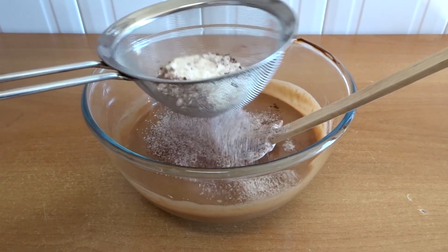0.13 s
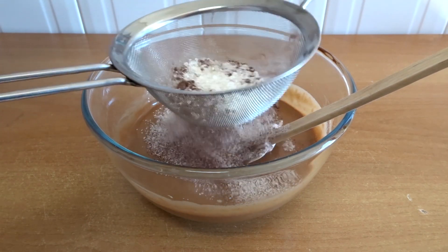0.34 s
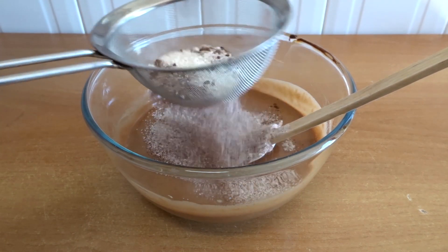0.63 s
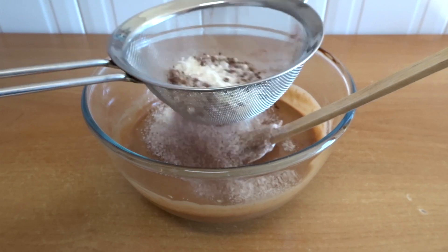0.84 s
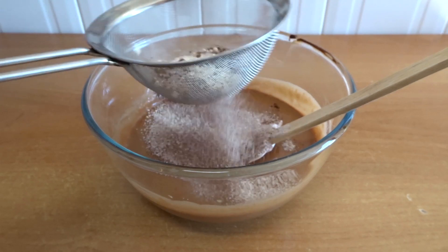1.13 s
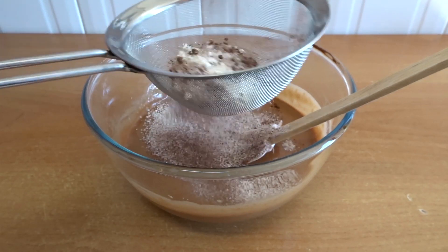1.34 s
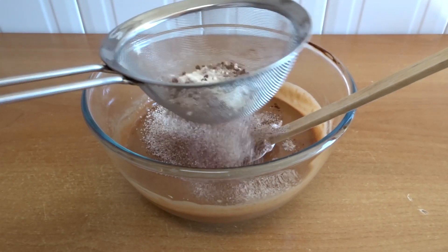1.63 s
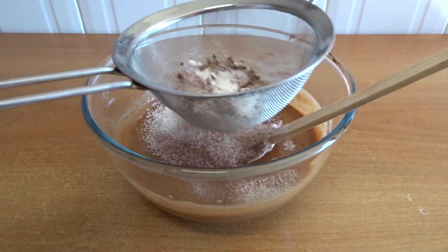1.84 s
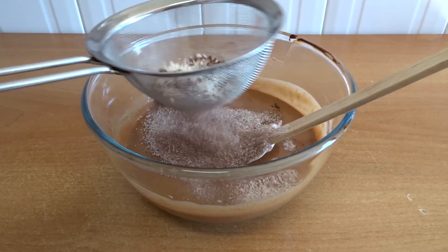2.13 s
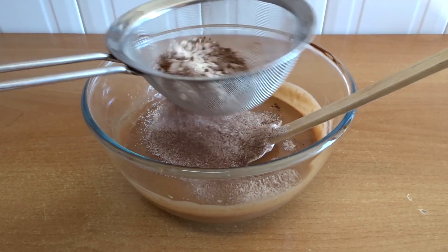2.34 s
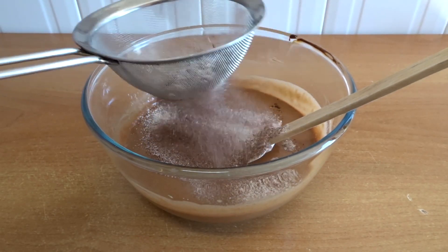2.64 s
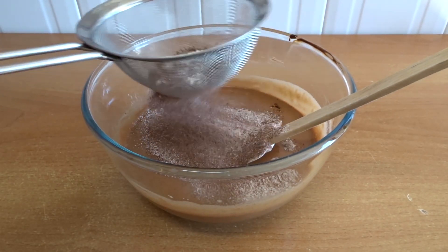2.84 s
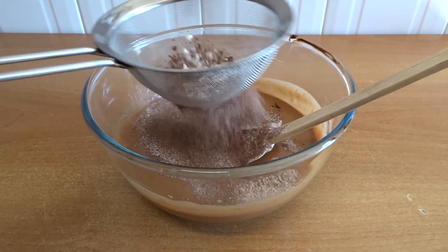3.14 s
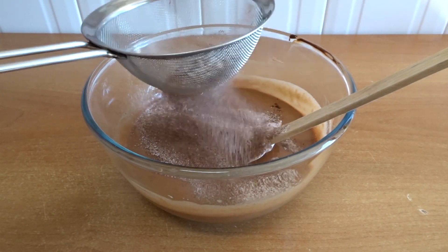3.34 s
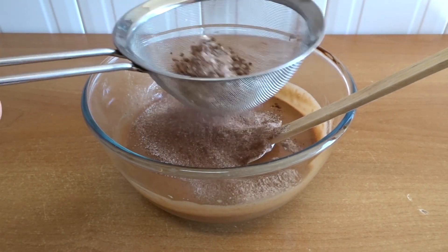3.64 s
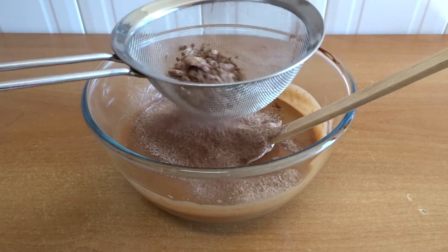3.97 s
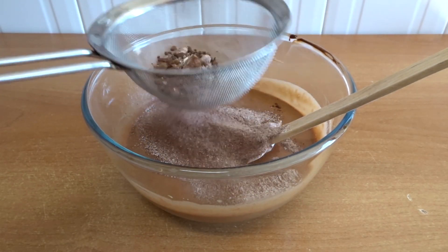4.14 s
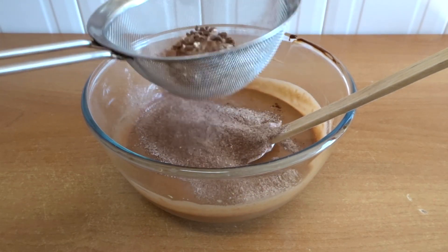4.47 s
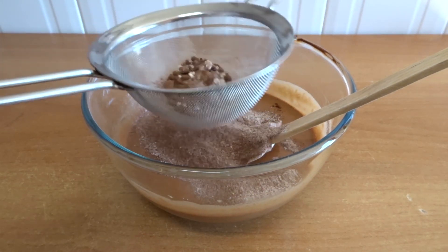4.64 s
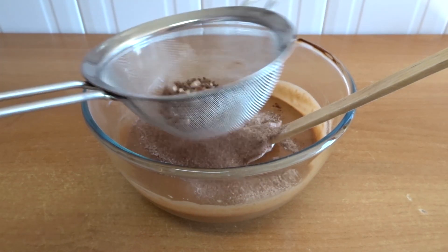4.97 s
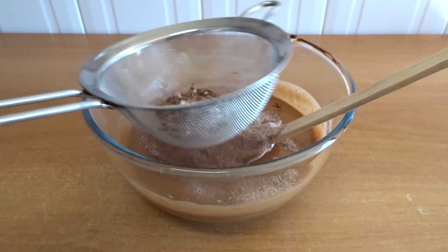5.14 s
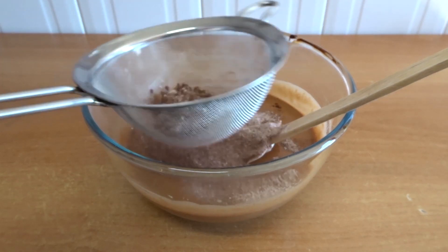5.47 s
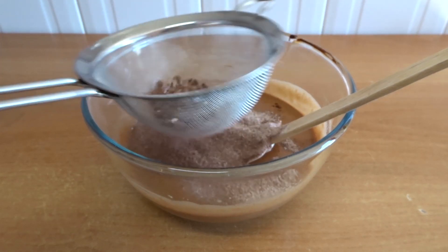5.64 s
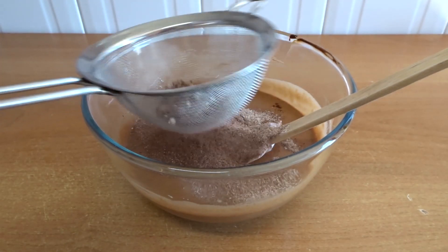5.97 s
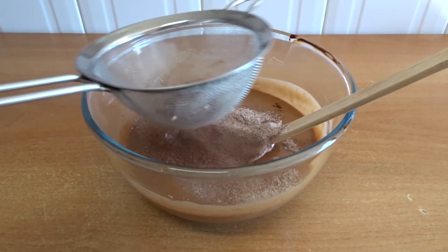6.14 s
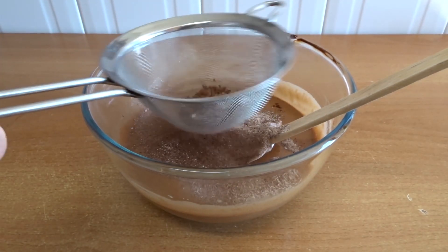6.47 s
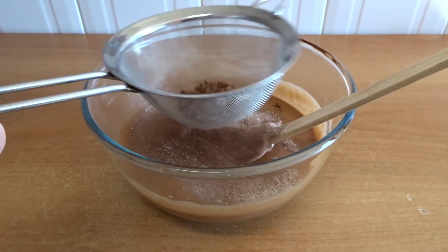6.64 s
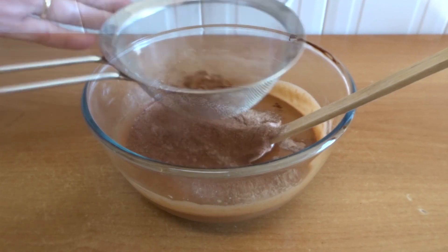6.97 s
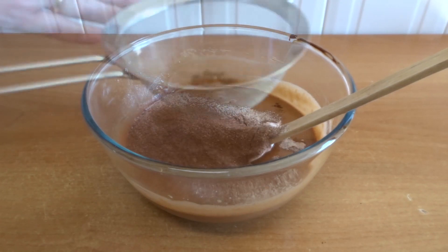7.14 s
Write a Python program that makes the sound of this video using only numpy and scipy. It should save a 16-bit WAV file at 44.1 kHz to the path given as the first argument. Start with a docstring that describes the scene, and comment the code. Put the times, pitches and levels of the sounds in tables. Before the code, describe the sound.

In a quiet kitchen, fine powder is shaken through a steel mesh sieve at about eleven or twelve soft, hissing strokes a second, with a faint metallic ring. After four seconds the shaking thins and pauses, then resumes. A dish knocks loudly with a quick bounce and scrapes in stuttering slips. Fainter strokes follow, then a sharp little click and a powdery slide. A clock ticks faintly. Close stereo microphone.

```python
"""Sieving flour and cocoa

Powder is shaken through a steel mesh sieve, more than eleven strokes a second: noise swells with each
stroke and rings the basket. A dish knocks and bounces as decaying modes and dense noise, then is dragged
in short juddering slips. At the end the sieve clicks and the last powder slides, as shaped noise.
A faint clock ticks in soft noise bursts over the room hiss, and the level dips briefly now and then."""
import sys
import numpy as np
from scipy import signal
from scipy.fft import rfft, irfft, next_fast_len
from scipy.io import wavfile
from scipy.ndimage import uniform_filter1d, map_coordinates

SR = 44100
rng = np.random.default_rng(int(sys.argv[2]) if len(sys.argv) > 2 else 0)


def waveform_to_disk(signal):
    """Save audio, clipped to [-1, 1], as 16-bit WAV at the path in sys.argv[1]."""
    frames = np.transpose(np.atleast_2d(signal))
    scaled = np.clip(frames, -1, 1) * 32767
    samples = np.round(scaled).astype(np.int16)
    wavfile.write(sys.argv[1], SR, samples)


N = 322371
T = np.arange(N) / SR  # time in seconds


def amp(db):
    """Decibels to gain."""
    return 10 ** (np.asarray(db) / 20)


def unit(x):
    """Scale to rms 1."""
    return x / np.sqrt(np.mean(x ** 2) + 1e-20)


def along(points, hz):
    """Read (Hz, value) points along a logarithmic frequency axis."""
    point_hz, values = np.transpose(points)
    return np.interp(np.log(hz + 1), np.log(point_hz + 1), values)


def wobble(rate):
    """A smooth random curve with this many knots a second."""
    knots = rng.standard_normal(int(N * rate / SR) + 4)
    return map_coordinates(knots, [T * rate])


def filtered(x, response):
    """Multiply the spectrum of x by a response of frequency."""
    n = x.shape[-1]
    size = next_fast_len(n + 8192)
    hz = np.fft.rfftfreq(size, 1 / SR)
    return irfft(rfft(x, size) * response(hz), size)[..., :n]


def pan(db):
    """Left and right gains for a level difference; positive leans left."""
    return amp(np.array([[db], [-db]]) / 2)


def add(out, s, sound):
    """Mix a sound in at time s."""
    part = out[:, round(s * SR):][:, :sound.shape[-1]]
    part += sound[..., :part.shape[1]]


# How alike left and right are in the room. Each row: frequency in Hz, correlation (1 is identical).
ROOM_LIKENESS = [(100, 0.92), (700, 0.92), (1400, 0.29), (2800, 0.26), (5000, 0.23), (12000, 0.084)]
# The same for the mesh and the clock. Each row: frequency in Hz, correlation.
MESH_LIKENESS = [(400, 0.039), (1400, 0.23), (2800, 0.31), (5000, 0.25), (9000, 0.26), (14000, 0.095)]


def coloured(pair, spectrum, likeness):
    """Two unrelated signals become a stereo pair of rms 1 with this spectrum and likeness."""
    def mid_and_side(hz):
        angle = np.arccos(np.clip(along(likeness, hz), -1, 1)) / 2
        return amp(along(spectrum, hz)) * [np.cos(angle), np.sin(angle)]

    mid, side = filtered(pair, mid_and_side)
    return unit(np.array([mid + side, mid - side]))


# An even spectrum. Each row: frequency in Hz, relative density in dB per Hz.
FLAT = [(100, 0), (10000, 0)]


def burst(spectrum, likeness):
    """One second of fresh coloured stereo noise."""
    return coloured(rng.standard_normal((2, SR)), spectrum, likeness)


def grains(spread_db):
    """Countless tiny impacts of log-normal size, the same sizes in both channels but with each channel's own
    noise."""
    return rng.standard_normal((2, N)) * amp(spread_db * rng.standard_normal(N))


def mesh(spectrum, spread_db):
    """Powder grains strike the wires: uneven noise coloured by the mesh."""
    return coloured(grains(spread_db), spectrum, MESH_LIKENESS)


def resonant(x, peaks):
    """Lift x at (Hz, width Hz, lift dB) resonances, then scale to rms 1."""
    def lift(hz):
        return amp(sum(db / (1 + (2 * (hz - centre) / width) ** 2) for centre, width, db in peaks))

    return unit(filtered(x, lift))


def swells(rows, attack_s, sag_db_per_s, release_db_per_s):
    """Gain of (start, length, dB) movements: each builds up, sags steadily, then dies away faster."""
    gain = 0
    for s, length, db in rows:
        sag = sag_db_per_s * np.maximum(T - s, 0)
        release = release_db_per_s * np.maximum(T - s - length, 0)
        gain = gain + np.clip((T - s) / attack_s, 0, 1) * amp(db - sag - release)
    return gain


# Reverberation of the kitchen. Each row: frequency in Hz, time to fall 60 dB in seconds.
KITCHEN = [(100, 0.15), (300, 0.62), (700, 0.48), (1500, 0.44), (3600, 0.43), (8000, 0.44), (14000, 0.11)]


def dying(noise):
    """A blow's sound in the kitchen: each frequency dies at its own speed."""
    hz, t, z = signal.stft(noise, SR, nperseg=256)
    decay = amp(-60 * t / along(KITCHEN, hz)[:, None])
    return signal.istft(z * decay, SR, nperseg=256)[1][:, :SR]


# Colour of the room air. Each row: frequency in Hz, relative density in dB per Hz.
HISS_COLOUR = [(60, -26), (250, -53.5), (340, -12.5), (440, 7), (580, -17.5), (780, -29), (1050, 1.5),
               (1500, 5.5), (2300, 4.5), (3200, -3.5), (5000, -2.5), (8000, -8), (11000, -24.5),
               (12500, -37.5), (15000, -45)]


def hiss(db=-68.5):
    """The quiet air of the kitchen: noise that is steady but for a very slight drift in level."""
    level = amp(db + 0.14 * wobble(3.8))
    return level * coloured(rng.standard_normal((2, N)), HISS_COLOUR, ROOM_LIKENESS)


# Ticks across the room. Each row: start in seconds, level in dB before rise and room decay.
TICKS = [(.825, -63), (1.827, -62.5), (2.83, -56.5), (3.82, -60.5), (4.824, -60), (5.825, -63)]
# Colour of a tick. Each row: frequency in Hz, relative density in dB per Hz.
TICK_COLOUR = [(300, -33), (750, -23.5), (950, 3), (1200, -8), (2200, -9.5), (3000, 1.5), (3400, -0.5),
               (3800, 3), (4300, -1.5), (6000, -6), (9000, -19), (15000, -24.5)]


def clock(second_s=.035, second_db=1, rise_s=0.0032):
    """Each two-part tick arrives only as a soft wash of decaying noise from the room."""
    out, t = np.zeros((2, N)), np.arange(SR) / SR
    rise = 1 - np.exp(-t / rise_s)
    for s, db in TICKS:
        for delay, part_db in [(0, 0), (second_s, second_db)]:
            wash = dying(burst(TICK_COLOUR, MESH_LIKENESS))
            add(out, s + delay, amp(db + part_db) * rise * wash)
    return out


# Small clicks of the sieve. Each row: start in seconds, level in dB before the rise, low corner in Hz,
# high corner in Hz, time to fall 60 dB in seconds, left-right difference in dB.
TAPS = [(1.5, -63, 850, 900, 0.12, 5), (2.897, -49.5, 1200, 6000, 0.027, -3.5),
        (4.379, -60, 900, 2200, 0.027, -5), (6.8246, -42.5, 350, 3000, 0.026, -5.5),
        (6.8266, -43, 2000, 3000, 0.015, -5), (6.865, -32.5, 750, 10760, 0.0093, -9),
        (6.869, -51.5, 130, 400, 0.014, 3), (6.999, -58, 130, 420, 0.09, 2)]
# Colour of a click before its band. Each row: frequency in Hz, relative density in dB per Hz.
TAP_COLOUR = [(40, -30), (150, -28), (450, 0), (1200, -6.5), (3000, -4), (5000, -6.5), (10000, -7.5),
              (15000, -14)]
# Resonances of the sieve's rim. Each row: frequency in Hz, width in Hz, lift in dB.
RIM = [(1900, 340, 8), (2850, 280, 13)]


def taps(rise_s=0.000068):
    """Short damped clicks of the hand-held sieve: band-limited noise lifted by the rim's resonances."""
    out, t = np.zeros((2, N)), np.arange(SR) / SR
    rise = 1 - np.exp(-t / rise_s)
    for s, db, low_hz, high_hz, t60, pan_db in TAPS:
        def band(hz):
            below_high = 1 / np.hypot(1, (hz / high_hz) ** 2)
            return below_high / np.hypot(1, (low_hz / (hz + 1)) ** 2)

        click = resonant(filtered(burst(TAP_COLOUR, ROOM_LIKENESS), band), RIM)
        add(out, s, click * amp(db - 60 * t / t60) * rise * pan(pan_db))
    return out


# Powder sliding on the tilted sieve. Each row: start in seconds, length in seconds, level in dB
# before attack and sag.
SLIDES = [(6.82, 0.16, -58), (7.04, 0.073, -56.5), (7.175, 0.3, -63)]
# Colour of the slide. Each row: frequency in Hz, relative density in dB per Hz.
SLIDE_COLOUR = [(100, -22), (200, -18.5), (400, -5), (750, -5), (1300, -1.5), (2000, 2.5), (3200, -1),
                (5000, -5), (9000, -11), (12000, -14.5), (15500, -21)]


def sliding(attack_s=0.032, sag_db_per_s=35, release_db_per_s=130):
    """The last powder slides over the tilted mesh: swells of grainy noise."""
    powder = mesh(SLIDE_COLOUR, spread_db=4)
    return swells(SLIDES, attack_s, sag_db_per_s, release_db_per_s) * powder * pan(db=-0.5)


# Pushes of the dish after the knock. Each row: start in seconds, length in seconds, level in dB
# before attack, sag and the drag's gain.
PUSHES = [(5.74, 0.38, -57), (5.932, 0.3, -48.5)]
# Slips during the second push. Each row: start in seconds, then scrape, groan, grit and thud levels
# in dB before the rise and the drag's gain.
SLIPS = [(5.95, -42.5, -60, -58, -74), (5.966, -44, -44, -55, -67), (5.988, -40.5, -38.5, -60, -71),
         (6.004, -38.5, -42, -63, -67), (6.016, -37.5, -36.5, -54, -61), (6.036, -38, -39, -53, -63),
         (6.046, -39.5, -43, -50, -70), (6.061, -36, -49, -51, -64), (6.081, -36, -53, -53, -49),
         (6.101, -39.5, -44, -62, -51), (6.119, -43, -44, -44, -54), (6.129, -40.5, -39, -60, -53),
         (6.143, -43.5, -51, -47, -51), (6.16, -39, -55, -52, -55), (6.174, -47, -49, -61, -60),
         (6.187, -48, -53, -66, -59)]
# Colour of the rubbing. Each row: frequency in Hz, relative density in dB per Hz.
RUB_COLOUR = [(60, -54), (130, -60), (240, -36.5), (350, -9.5), (560, -2.5), (740, -4.5), (850, -4.5),
              (1100, -0.5), (1350, -6), (1850, -10.5), (2050, -13.5), (3200, -17), (4700, -27),
              (7000, -35.5), (9500, -37), (12000, -73)]
# Clusters of close modes that colour drag and knock. Each row: frequency in Hz, width in Hz, lift in dB.
CLUSTERS = [(1570, 90, 5), (1850, 90, 3), (3620, 120, 9), (5410, 150, 14), (6290, 140, 12), (7480, 240, 9),
            (8270, 90, 8), (9055, 90, 9)]
# Resonances a slip sets off. Each holds: frequency in Hz, width in Hz, time to fall 60 dB in seconds.
GROAN = (850, 140, .09)
GRIT = (2450, 490, 0.041)
SLIP_THUD = (350, 154, .09)


def drag(attack_s=0.048, sag_db_per_s=24, release_db_per_s=340, wet_db=-7, gain_db=-2.5):
    """The dish judders along the table in slips, each with its groan, grit and thud; the room smears them."""
    rubbing = resonant(coloured(grains(spread_db=4.5), RUB_COLOUR, ROOM_LIKENESS), CLUSTERS)
    rub = swells(PUSHES, attack_s, sag_db_per_s, release_db_per_s) * rubbing
    t = np.arange(SR) / SR
    slip_t60, slip_rise_s = .07, .0045
    for s, scrape_db, *levels in SLIPS:
        scrape = resonant(burst(RUB_COLOUR, ROOM_LIKENESS), CLUSTERS)
        slip = scrape * amp(scrape_db - 60 * t / slip_t60)
        for (centre, width, t60), db in zip([GROAN, GRIT, SLIP_THUD], levels):
            ring = filtered(burst(FLAT, ROOM_LIKENESS),
                            lambda hz: 1 / (1 + (2 * (hz - centre) / width) ** 4))
            slip = slip + unit(ring) * amp(db - 60 * t / t60)
        add(rub, s, slip * (1 - np.exp(-t / slip_rise_s)))
    tail = dying(burst(FLAT, ROOM_LIKENESS))
    tail = tail / np.linalg.norm(tail[0])
    wet = signal.fftconvolve(rub.mean(axis=0)[None], tail, axes=1)[:, :N]
    return amp(gain_db) * (rub + amp(wet_db) * wet) * pan(db=1.5)


# Contacts of the bouncing dish. Each row: start in seconds, relative level of the ring in dB,
# snap level in dB, jolt level in dB before its bass cut, jolt frequency in Hz.
KNOCKS = [(5.474, -21.5, -24, -19, 1300), (5.4772, -29, -32, -18.5, 2400),
          (5.481, -24.5, -41.5, -23.5, 1203), (5.5048, -25, -32.5, -19, 1725),
          (5.5149, -27, -34.5, -11, 1400), (5.5266, -33, -47, -15.5, 850)]
# Hard edge of a contact. Each row: frequency in Hz, relative density in dB per Hz.
SNAP_COLOUR = [(300, -25.5), (1500, 9.5), (4000, 5), (5500, -14), (9000, -18.5), (15000, -29.5)]
# Dense ring of dish and table. Each row: frequency in Hz, relative density in dB per Hz.
THUD_COLOUR = [(30, -69), (85, -53), (130, -17.5), (200, -46.5), (300, -20), (430, -5.5), (690, 4),
               (1300, 7), (2200, 2.5), (3000, -5.5), (4100, -8.5), (4700, -11.5), (6000, -19), (10000, -31),
               (12000, -49.5), (15000, -59)]


def contacts(crack_db=5, snap_t60=0.026):
    """Every contact jolts the dish, snaps, cracks and sets off a dense ring in dish, table and room."""
    out, t = np.zeros((2, N)), np.arange(SR) / SR
    dense_db, rise_s = -8, .0004
    crack_t60, jolt_t60, jolt_low_hz = .02, .008, 450
    attack = 1 - np.exp(-t / rise_s)
    for s, db, snap_db, jolt_db, jolt_hz in KNOCKS:
        # the direct jolt is a few cycles long and thin in the bass
        cycles = amp(jolt_db - 60 * t / jolt_t60) * np.sin(2 * np.pi * jolt_hz * t)
        jolt = filtered(cycles, lambda hz: (1j * hz / (jolt_low_hz + 1j * hz)) ** 2)
        snap = amp(snap_db - 60 * t / snap_t60) * burst(SNAP_COLOUR, ROOM_LIKENESS)
        add(out, s, jolt + snap)
        dense = dying(resonant(burst(THUD_COLOUR, ROOM_LIKENESS), CLUSTERS))
        crack = burst(THUD_COLOUR, ROOM_LIKENESS) * amp(crack_db - 60 * t / crack_t60)
        add(out, s, amp(db + dense_db) * attack * (dense + crack * pan(db=6.0)))
    return out


# Modes of the dish. Each row: frequency in Hz, relative level in dB, time to fall 60 dB in seconds.
DISH_MODES = [(137, -23.1, 0.26), (257, -17.7, 0.45), (325, -19.5, 0.45), (393, -19, 0.55),
              (440, -14.5, 0.4), (540, -10.1, 0.35), (588, -14.2, 0.45), (626, -6.6, 0.45),
              (657, -9.0, 0.45), (689, -6, 0.33), (711, 0, 0.28), (748, -10, 0.45), (824, -6, 0.31),
              (854, -2.0, 0.3), (881, -0.5, 0.4), (947, -3, 0.42), (985, -7, 0.35), (1043, -5, 0.35),
              (1082, -6, 0.25), (1116, 2.5, 0.24), (1149, 2.6, 0.32), (1188, -2.4, 0.32), (1241, 1, 0.29),
              (1315, -4.5, 0.33), (1341, 4, 0.3), (1375, -3.8, 0.3), (1409, -6.0, 0.4), (1438, 1, 0.3),
              (1497, -7, 0.38), (1540, -1.8, 0.28), (1567, -3, 0.34), (1637, -7, 0.25), (1680, -5.5, 0.26),
              (1768, -5.5, 0.28), (1795, -6, 0.26), (1835, -8.5, 0.28), (1859, -8.5, 0.36),
              (1941, -9.3, 0.36), (2056, -9, 0.25), (2101, -4.0, 0.24), (2164, -7.2, 0.32),
              (2188, -9, 0.34), (2229, -8, 0.34), (2275, -12, 0.3), (2430, -15, 0.35), (2492, -17.0, 0.4),
              (2716, -12, 0.3), (2881, -13.1, 0.34), (3008, -10.5, 0.28), (3110, -16.6, 0.44),
              (3502, -14.4, 0.33), (3534, -13.9, 0.39), (3597, -14.4, 0.42), (3731, -18, 0.2),
              (4000, -21, 0.27), (4130, -20, 0.27), (4247, -21, 0.29), (5003, -14.5, 0.2),
              (5334, -17, 0.28), (5399, -9.5, 0.23), (5432, -17, 0.26), (6247, -16.5, 0.24),
              (6281, -17, 0.25), (7330, -26.5, 0.22), (7526, -23, 0.28), (8247, -30, 0.5),
              (9055, -27.5, 0.27), (9679, -32.5, 0.3), (10300, -36, 0.4), (10620, -37, 0.35)]
MODE_SPREAD = 0.28  # share of the room's left-right phase angle given to each mode


def dish_ring(ring_db=-13.3, rise_s=.0004):
    """The dish rings in decaying sine modes; every contact adds its energy to each mode."""
    out, t, start = np.zeros((2, N)), np.arange(SR) / SR, KNOCKS[0][0]
    attack = 1 - np.exp(-t / rise_s)
    for hz, mode_db, t60 in DISH_MODES:
        energy = 0
        for s, db, *_ in KNOCKS:
            since = t + start - s
            energy = energy + amp(db - 60 * np.abs(since) / t60) ** 2 * (since >= 0)
        swing = attack * np.sqrt(np.abs(uniform_filter1d(energy, size=256)))
        # where left and right are less alike, the mode reaches them further out of step
        angle = np.arccos(np.clip(along(ROOM_LIKENESS, hz), -1, 1))
        apart = MODE_SPREAD * angle * rng.choice([-1, 1]) * np.array([[.5], [-.5]])
        sine = np.sin(2 * np.pi * (hz * t + rng.random()) + apart)
        add(out, start, amp(ring_db + mode_db) * swing * sine)
    return out


def knock():
    """The dish lands and bounces: noisy contacts over the ring of its modes."""
    return contacts() + dish_ring()


# Resonances of the mesh basket. Each row: frequency in Hz, width in Hz, relative level in dB.
BASKET = [(462, 27, -7), (650.6, 150, -8.5), (972, 19, -3), (1366, 39, -2), (1465, 98, 1), (2355, 200, 3),
          (3170, 290, -7.5)]


def basket(x, tuning):
    """Pass x through the basket's resonances, shifted by a tuning factor, and scale to rms 1."""
    def response(hz):
        return sum(amp(db) / (1 + (2 * (hz - centre * tuning) / width) ** 2)
                   for centre, width, db in BASKET)

    return unit(filtered(x, response))


# Strokes of the sieve, resting after four seconds; played by ringing() and shaking().
# Each row: time in seconds, relative powder hiss in dB, relative basket ring in dB.
STROKES = [(0.016, -62.5, -68), (0.085, -64.5, -73), (0.165, -63, -67.5), (0.256, -59, -72),
           (0.333, -61, -68), (0.414, -61, -76), (0.497, -58.5, -67), (0.581, -59, -66),
           (0.663, -59.5, -65.5), (0.754, -58, -65), (0.838, -60, -62), (0.919, -58.9, -65.3),
           (0.999, -58.5, -67.5), (1.091, -58, -62.5), (1.17, -60.5, -65), (1.258, -59.5, -65.5),
           (1.344, -63, -70), (1.426, -61, -66.5), (1.496, -61.5, -70), (1.583, -61, -65.5),
           (1.662, -63.5, -66), (1.746, -62.5, -75), (1.835, -60, -65), (1.917, -57.5, -67),
           (1.998, -58, -67.5), (2.084, -59.5, -66), (2.171, -59, -76), (2.26, -57.5, -64),
           (2.354, -57, -68), (2.441, -56.5, -63), (2.53, -57.5, -64.5), (2.621, -56.5, -62.5),
           (2.708, -57, -71), (2.805, -56, -65), (2.893, -58, -61), (2.988, -57, -62.5),
           (3.075, -58.5, -64.5), (3.164, -61, -65.5), (3.249, -63.5, -69.5), (3.334, -61, -67.5),
           (3.419, -62.5, -67), (3.514, -61.5, -70), (3.599, -61.5, -71), (3.688, -61, -67.5),
           (3.779, -62.5, -69), (3.866, -63, -66), (3.947, -63.5, -70), (4.043, -64, -67.5),
           (4.139, -65, -78), (4.21, -74, -86), (4.335, -83, -82), (4.409, -74, -67), (4.62, -99, -69.5),
           (4.754, -68.5, -68), (4.844, -63.5, -64.5), (4.912, -62, -66), (4.998, -61.0, -68.5),
           (5.077, -65, -75), (5.146, -68, -70), (5.231, -65.5, -78), (5.318, -66, -70.5),
           (5.399, -63, -65.5), (5.48, -62, -63), (5.565, -68, -66), (5.645, -79, -57),
           (5.731, -65.5, -60.5), (5.827, -61.5, -64), (5.918, -62, -66), (6.003, -66, -62),
           (6.099, -72, -73), (6.169, -76, -80), (6.265, -69.4, -68), (6.348, -68.5, -69),
           (6.432, -68.5, -67), (6.507, -68, -72.5), (6.587, -69, -70), (6.664, -68.5, -73),
           (6.745, -69, -73.5)]
DETUNE = .022  # scatter of the basket's pitch from stroke to stroke, as a share


def ringing(width_s=0.015, lead_s=0.004, gain_db=-1):
    """Each stroke rings the basket; the shifting load detunes it a little every time."""
    out, t = np.zeros((2, N)), np.arange(SR // 5) / SR
    drive = mesh(FLAT, spread_db=1.5)
    for (s, _, db), chance in zip(STROKES, rng.standard_normal(len(STROKES))):
        start = max(s - t.mean(), 0)
        ring = basket(drive[:, round(start * SR):][:, :len(t)], 1 + DETUNE * chance)
        # the ring swells and falls around a peak just ahead of the stroke time
        swell = np.exp(-.25 * ((start + t - s + lead_s) / width_s) ** 2)
        add(out, start, ring * amp(db + gain_db) * swell)
    return out * pan(db=2.0)


# Colour of the low noise under the strokes. Each row: frequency in Hz, relative density in dB per Hz.
LOW_COLOUR = [(50, -36), (100, -21), (200, -36), (300, -14.5), (380, -5), (470, 1.5), (650, 4), (760, 0),
              (920, 0.5), (1500, -0.5), (2500, -18), (8000, -41)]


def low_flutter(db=-9):
    """Low noise under the strokes: each band flutters at random by itself."""
    flutter_db, crest_db, flutter_rate = 6, 4, 45  # rate in knots a second
    edges_hz = [0, 400, 520, 740, 1050, SR / 2]
    noise = mesh(LOW_COLOUR, spread_db=3.5)
    bands = 0
    for low, high in zip(edges_hz, edges_hz[1:]):
        # capped crests give bumps of like height, with deep gaps between them
        flutter = amp(np.minimum(flutter_db * wobble(flutter_rate), crest_db))
        bands = bands + flutter * filtered(noise, lambda hz: (hz >= low) & (hz < high))
    return amp(db) * unit(bands)


# Powder on the mesh. Each row: frequency in Hz, relative density in dB per Hz.
POWDER_COLOUR = [(200, -73.5), (330, -26), (450, -11), (800, -23), (1300, -13.5), (1900, -4.5), (3000, 1.5),
                 (4500, 1), (6500, -2), (9000, 2.5), (10800, 1), (12500, -8.5), (15500, -16)]
# Finest grains. Each row: frequency in Hz, relative density in dB per Hz.
FIZZ_COLOUR = [(3000, -19), (7000, -14.5), (10000, -3.5), (13000, 7.5), (15500, -1)]
LOW_FADES_S, LOW_FADE_DB_PER_S = 2.86, 19  # from here on the low noise fades


def shaking(width_s=0.019, gain_db=-1.52, body_db=-7, body_hz=3500, hum_db=-12, fizz_db=-7):
    """Each stroke throws the powder across the mesh: noise swells over a duller, steadier body."""
    power = sum(amp(db) ** 2 * np.exp(-.5 * ((T - s) / width_s) ** 2) for s, db, _ in STROKES)
    flow = np.sqrt(power) * amp(gain_db + 0.63 * wobble(90))
    sizzle = flow * mesh(POWDER_COLOUR, spread_db=2.5)
    # the extra treble follows the stroke level more steeply
    steeper = flow * np.sqrt(power / power.max())
    fizz = steeper * amp(fizz_db) * mesh(FIZZ_COLOUR, spread_db=5.5)
    fade_db = -LOW_FADE_DB_PER_S * np.maximum(T - LOW_FADES_S, 0)
    lows = flow * amp(fade_db) * low_flutter()
    # the basket keeps sounding, duller, between strokes as the powder rolls back
    rolling = np.sqrt(np.abs(uniform_filter1d(power, size=4400)))  # smoothed over a tenth of a second
    dull = filtered(mesh(POWDER_COLOUR, spread_db=0.5), lambda hz: 1 / np.hypot(1, hz / body_hz))
    hum = basket(mesh(FLAT, spread_db=-2.0), 1)
    body = amp(body_db) * dull + amp(hum_db) * hum
    return (sizzle + fizz + lows + rolling * body) * pan(db=0.56)


# Brief dips in level, mostly in the lows. Each row: centre in seconds, Gaussian spread in seconds,
# depth in dB, upper corner in Hz.
DIPS = [(.17, .035, -19, 517), (1.04, 0.017, -12, 900), (1.21, 0.023, -12, 900), (1.775, 0.019, -29, 1070),
        (1.845, 0.013, -16, 650), (2.31, 0.013, -18, 600), (3.2, 0.0078, -23, 900), (3.43, 0.011, -23, 885),
        (3.91, 0.015, -19, 840), (3.985, .02, -28, 845), (4.07, 0.017, -21, 900), (4.95, 0.017, -17.5, 900),
        (5.11, 0.005, -6, 920), (7.18, .009, -14, 20000)]


def dipped(x):
    """The level dips briefly, each time below a frequency of its own."""
    hz, t, z = signal.stft(x, SR, nperseg=512)
    depth_db = 0
    for s, width_s, db, below_hz in DIPS:
        dip = np.exp(-.5 * ((t - s) / width_s) ** 2)
        depth_db = depth_db + db * dip / (1 + (hz[:, None] / below_hz) ** 6)
    return signal.istft(z * amp(depth_db), SR, nperseg=512)[1][:, :N]


def scene(lag_s=4e-5):
    """Everything on and around the table; the dish reaches the left side first."""
    sides = np.array([[.5], [-.5]])
    dish = filtered(knock() + drag(), lambda hz: np.exp(2j * np.pi * hz * lag_s * sides))
    sieve = shaking() + ringing() + sliding() + taps()
    return dipped(hiss() + clock() + dish + sieve)


TOP_HZ = 15750  # band limit


def record(dry, low_cut_hz=70):
    """The deep bass is thinned and nothing sounds above the band limit."""
    return filtered(dry, lambda hz: (1j * hz / (low_cut_hz + 1j * hz)) ** 2 * (hz < TOP_HZ))


dry = scene()
out = record(dry)
waveform_to_disk(out)
```